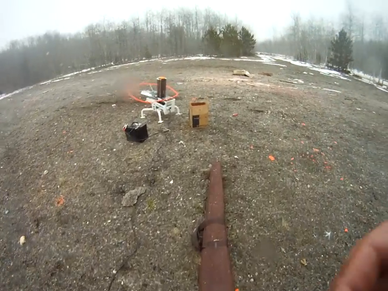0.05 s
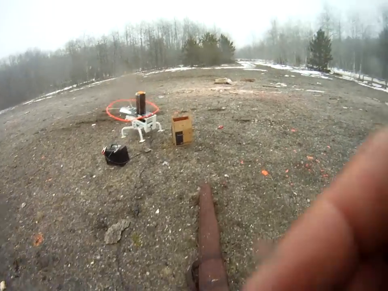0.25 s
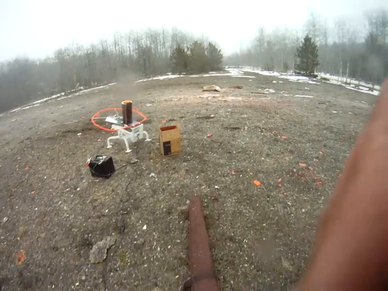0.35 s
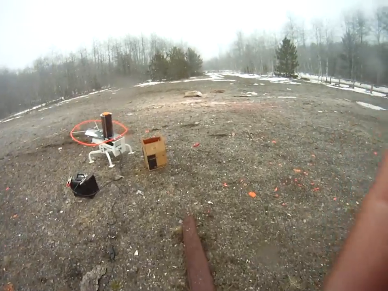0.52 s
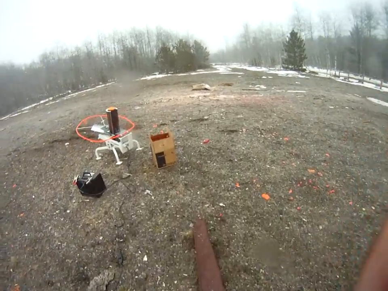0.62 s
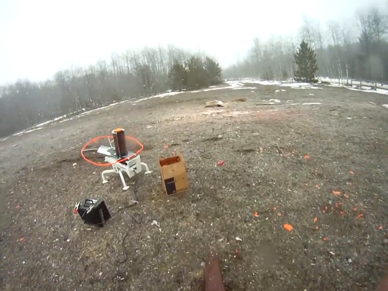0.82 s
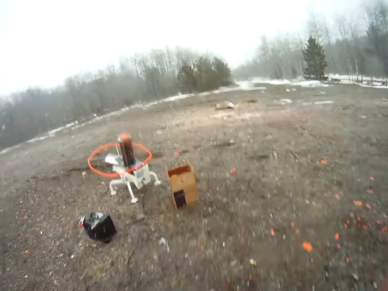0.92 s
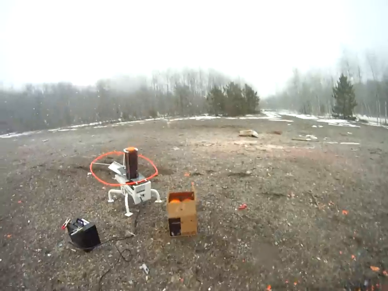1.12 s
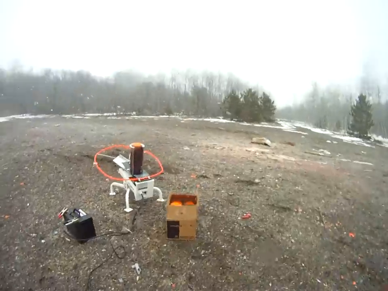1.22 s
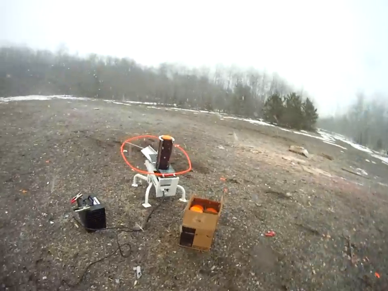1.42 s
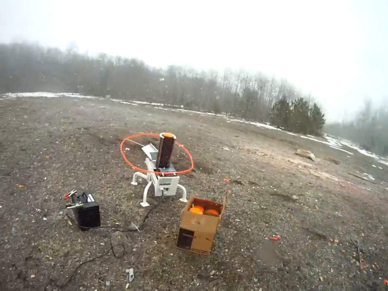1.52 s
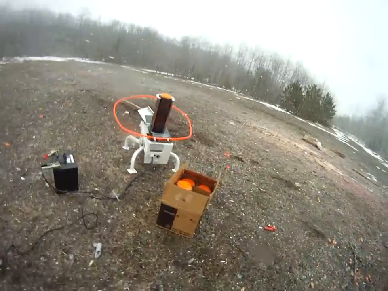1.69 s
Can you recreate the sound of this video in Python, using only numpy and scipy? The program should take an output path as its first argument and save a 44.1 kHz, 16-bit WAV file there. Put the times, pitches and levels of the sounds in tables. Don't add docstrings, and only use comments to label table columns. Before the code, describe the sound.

Close handling noise on a hard camera housing: light ticks, one loud sharp knock with metallic clinking, then rubs and low thumps, a gritty scrape, and scattered taps, over faint outdoor hiss, in coarse lo-fi sound.

```python
import sys
import numpy as np
from scipy import signal
from scipy.fft import rfft, irfft, next_fast_len
from scipy.io import wavfile
from scipy.ndimage import map_coordinates

SR = 44100
rng = np.random.default_rng(int(sys.argv[2]) if len(sys.argv) > 2 else 0)


def gain_from_db(level_db):
    decades = np.asarray(level_db, float) / 20
    return 10 ** decades


def unload_audio(sound):
    columns = np.transpose(np.atleast_2d(sound))
    steps = np.round(np.clip(columns, -1, 1) * 32767)
    wavfile.write(sys.argv[1], SR, steps.astype(np.int16))


N = 77175


def unit(x):
    return x / np.sqrt(np.mean(x ** 2) + 1e-20)


def along(points, f):
    hz, db = np.transpose(points)
    return gain_from_db(np.interp(np.log(f + 1), np.log(hz + 1), db))


def wobble(rate):
    knots = rng.standard_normal(int(N * 1000 / SR) + 4)
    return map_coordinates(knots, [np.arange(N) * rate / SR])


def filtered(x, response):
    m = next_fast_len(N + SR // 2)
    return irfft(rfft(x, m) * response(np.fft.rfftfreq(m, 1 / SR)), m)[..., :N]


def colored_noise(spectrum):
    return unit(filtered(rng.standard_normal(N), lambda f: along(spectrum, f)))


def body(modes, f):
    total = 0
    for k, (hz, width, db) in enumerate(modes):
        total = total + (-1) ** k * gain_from_db(db) * 1j * f * width / (hz * hz - f * f + 1j * f * width)
    return total


def swings(rows):
    out = np.zeros(N)
    for start_s, level_db, pitch_hz, rise_s in rows:
        t = np.clip(np.arange(N) / SR - start_s, 0, None)
        swell = t / rise_s * np.exp(1 - t / rise_s)
        out = out - gain_from_db(level_db) * swell * np.sin(2 * np.pi * pitch_hz * t)
    return out


def stroke(start_s, length_s, level_db, rise_share):
    u = (np.arange(N) / SR - start_s) / length_s
    peak = np.clip(rise_share, .02, .95)
    press = np.interp(u, [0, peak, 1, 1.15, 1.6], [0, 1.0, 0.23, 0.027, 0])
    return gain_from_db(level_db) * press ** 0.75


def strokes(rows):
    return sum(stroke(*row) for row in rows)


def rub(force, response, grit_db):
    noise = rng.standard_normal(N)
    grit = unit(noise * gain_from_db(grit_db * wobble(400) + 1.8 * wobble(70)))
    return filtered(force * grit, response) / np.std(filtered(grit, response))


# time_s, level_db
SHAKE = [(0, -51.5), (0.198, -54), (.37, -52), (.43, -41.5), (0.468, -33), (.52, -44), (.6, -35),
         (0.837, -47.5), (.89, -42.5), (0.999, -29), (1.07, -40), (1.25, -39), (1.3, -47.5), (1.43, -40),
         (1.48, -37.5), (1.559, -32), (1.66, -41.5), (1.75, -42)]
# pitch_hz, level_db [dB per Hz]
RUMBLE = [(12, -32), (20, 1), (75, -14), (101, -20), (338, -57.5), (483, -51.5), (700, -63.5), (910, -88.5),
          (1540, -120)]
# start_s, level_db [peak], pitch_hz
JOLTS = [
    (0.2142, -8, 616),
    (0.4464, -29, 62),
    (0.5398, -9.5, 44.7),
    (0.8743, -29.5, 43),
]
# start_s, level_db [peak], pitch_hz, rise_s
SWAYS = [
    (1.4565, -18, 41, .016),
    (1.535, -26, 31, .02),
    (1.658, -29, 30, .02),
    (.99, -33, 30, .02),
    (.214, -36, 85, .01),
]


def shaking():
    t = np.arange(N) / SR
    time_s, level_db = np.transpose(SHAKE)
    out = gain_from_db(np.interp(t, time_s, level_db) + 0.53 * wobble(16)) * colored_noise(RUMBLE)
    hold_cycles, decay_cycles, rise_s = 0.45, 2, 0.000067
    for start_s, level_db, pitch_hz in JOLTS:
        u = np.clip(t - start_s, 0, None)
        fall_db = 60 * np.clip(u * pitch_hz - hold_cycles, 0, None) / decay_cycles
        push = np.cos(2 * np.pi * pitch_hz * u) * (1 - np.exp(-u / rise_s))
        out = out - gain_from_db(level_db - fall_db) * push
    return out + swings(SWAYS)


# pitch_hz, level_db [dB per Hz]
AIR = [(88, -37.5), (150, 3.5), (878, -13.5), (1950, -15), (5300, -21), (5900, -34.5), (7670, -59.5),
       (13000, -120)]


def air():
    return gain_from_db(-62 + 1.3 * wobble(10)) * colored_noise(AIR)


# pitch_hz, width_hz, level_db
SHELL = [(1500, 490, -9), (2080, 240, 1.5), (2396, 375, -5), (3525, 320, -6.5), (4960, 1200, -28.5)]
# pitch_hz, width_hz, level_db
DULL = [(887.6, 210, -3.5), (1223, 160, 0.5)]
# start_s, level_db [peak], t60_s, brightness [dB per octave]
TAPS = [(0.0493, -44, 0.016, 1), (0.0526, -14, 0.012, 10), (.1113, -25.5, 0.017, 6.5),
        (.1226, -46, 0.01, 1), (0.1439, -21, 0.022, 5.5), (0.1592, -29.5, 0.011, 5),
        (0.1883, -21, 0.0066, 7.5), (.2134, 8, 0.016, -1.5), (0.2244, -13.5, 0.015, -2),
        (.2316, -11, .015, -1), (0.2457, -1, .018, 3), (.2668, -10.5, .017, 3), (0.3914, -36, 0.016, 4),
        (0.4391, -16.5, 0.0087, -1), (0.4468, -20, 0.011, -8), (.4551, -16.5, 0.017, -1.5),
        (.4751, -13.5, 0.0099, 1), (.5401, -10.5, 0.027, 2.5), (0.553, -33, 0.014, 0),
        (0.66, -9, 0.014, 4.5), (0.8738, -24, 0.0265, -4), (0.9105, -26, 0.012, 5),
        (1.1412, -3.5, 0.016, 4), (1.2105, -23, 0.021, 6.5), (1.3571, -44, 0.014, 6.5),
        (1.4168, -31.5, .013, 6), (1.4557, -12, .013, 10), (1.551, -9.5, 0.014, 0.5),
        (1.5645, -12.5, 0.013, 3), (1.5984, -10, .013, 14), (1.7481, -30.5, 0.012, -12)]


def taps():
    out, t = np.zeros(N + SR), np.arange(SR // 20) / SR
    f = np.fft.rfftfreq(len(t), 1 / SR)
    flat = 0.075
    both_sides = body(SHELL, f) + gain_from_db(-11) * body(DULL, f) + flat
    octaves = np.log2(np.clip(f, 500, 6000) / 2000)
    for start_s, level_db, t60_s, tilt_db in TAPS:
        kick = 3.7 * (t == 0)
        burst = rng.standard_normal(len(t)) * gain_from_db(-60 * t / t60_s) + kick
        ring = irfft(rfft(burst) * both_sides * gain_from_db(tilt_db * octaves), len(t))
        ring = ring * gain_from_db(-15 * t / t60_s)
        out[round(start_s * SR):][:len(t)] += gain_from_db(level_db - 2) * ring / np.abs(ring).max()
    return out[:N]


# pitch_hz, level_db, t60_s
FITTING = [(421, -24.5, 0.34), (702, -25, .08), (973, -17, 0.044), (1182, -9, 0.067), (2412, 1.5, .032),
           (3610, -7, 0.046)]
# start_s, level_db [peak], low_modes_db, middle_mode_db
CLINKS = [(.0655, -15.5, -9.5, 5.5), (.1955, -21.5, -12, 2.5), (.2136, 4, 2, 3.5), (.2318, -4, -1, 1.5),
          (.2448, 0, 1.5, -3), (.2668, -1, 0, -2), (.2975, -15, 0.5, 1.5), (.3021, -9.5, -6, 1.5),
          (.3105, -9.5, -2.5, -2), (.3156, -13.5, 2, -3.5), (1.1411, -22, 13, -2), (1.4861, -15.5, 9, -9)]


def clinks():
    out, t = np.zeros(N + SR), np.arange(SR // 3) / SR
    attack = 1 - np.exp(-t / 0.00043)
    for start_s, level_db, low_db, middle_db in CLINKS:
        ring = 0
        for pitch_hz, mode_db, t60_s in FITTING:
            weight_db = low_db * (pitch_hz < 1000) + middle_db * (2000 < pitch_hz < 3000)
            strength_db = mode_db + weight_db + 2.9 * rng.standard_normal()
            ring = ring + gain_from_db(strength_db - 60 * t / t60_s) * np.sin(2 * np.pi * pitch_hz * t)
        out[round(start_s * SR):][:len(t)] += gain_from_db(level_db - 13.5) * ring * attack
    return out[:N]


# start_s, length_s, level_db, rise_share [0-1], dull_side_db
STROKES = [(0.215, .021, -18.5, 0.5, 8.5), (0.239, .04, -28, 0.8, -5), (0.29, 0.023, -25.5, 1, 2.5),
           (.33, .09, -59.5, 0.64, 3), (0.444, 0.035, -31, 0.4, -0.5), (0.4817, 0.038, -30, 0.32, 1.5),
           (0.512, 0.077, -41.5, 0.36, -3), (0.584, 0.068, -34, 0.48, -9.5),
           (0.652, 0.066, -35.5, 0.13, -6), (0.719, 0.1, -43, 0.2, -4.5), (0.819, 0.36, -47, 0.38, -2),
           (0.969, 0.035, -28.5, 0.82, -13), (0.998, 0.028, -16.5, 0.66, -10.5),
           (1.04, 0.042, -45, 0.75, 0.5), (1.07, 0.074, -37, 0.3, -9), (1.135, 0.022, -42, 0.1, -10),
           (1.17, .15, -65, 0.3, 2), (1.311, .05, -66.5, 0.7, -4), (1.455, 0.027, -27, 0.24, 8),
           (1.483, 0.062, -34, 0.05, 1.5), (1.542, 0.07, -37.5, 0.63, 0), (1.616, 0.029, -38, 0.42, -5),
           (1.651, 0.034, -39, 0.26, 0), (1.672, 0.036, -37, 0.63, 5), (1.722, 0.037, -49.5, 0.56, 2)]
# pitch_hz, level_db [dB per Hz]
SKIN = [(300, -59.5), (800, -21), (2170, -5), (3050, -25.5), (3780, -19), (5900, -17), (7670, -52.5),
        (13000, -120)]
# start_s, length_s, level_db, rise_share [0-1]
PRESSES = [
    (0.209, .03, -44.5, 0),
    (.34, 0.054, -50.5, 0.6),
    (0.443, .07, -36, .3),
    (0.597, .22, -54, 0.42),
    (0.864, 0.034, -46.5, 0.4),
    (0.978, 0.058, -38, 0.2),
    (1.044, 0.12, -50, 0),
    (1.486, 0.0275, -47, 0.27),
]
# pitch_hz, width_hz, level_db
PALM = [(128, 64, 0), (380, 380, -2.5)]
# start_s, length_s, level_db, rise_share [0-1]
CHATTER = [
    (0.221, .051, -25, 0.3),
    (0.987, 0.023, -24.5, 0.7),
    (1.4795, .015, -21.5, 0.2),
    (1.495, 0.029, -31, .21),
    (1.579, .041, -45, 0.6),
    (1.6224, .027, -27.5, 0.5),
]
# pitch_hz, width_hz, level_db
PIN = [(1203, 74, -4), (3640, 88, 1), (2100, 130, -11.5)]


def rubbing():
    force, dull_force = np.zeros(N), np.zeros(N)
    for start_s, length_s, level_db, rise_share, dull_db in STROKES:
        press = stroke(start_s, length_s, level_db, rise_share)
        force = force + press
        dull_force = dull_force + gain_from_db(dull_db - 5.0) * press

    def stiff(f):
        return (1j * f / (650 + 1j * f)) ** 2

    bright = rub(force, lambda f: body(SHELL, f) * stiff(f), grit_db=2)
    dull = rub(dull_force, lambda f: body(DULL, f) * stiff(f), grit_db=1.5)
    skin = gain_from_db(-8) * rub(force, lambda f: along(SKIN, f), grit_db=3.5)
    chatter = rub(strokes(CHATTER), lambda f: body(PIN, f), grit_db=3.5)
    palm = rub(strokes(PRESSES), lambda f: body(PALM, f) ** 2, grit_db=2.0)
    return bright + dull + skin + chatter + palm


# start_s, level_db [peak], pitch_hz, rise_s
ROCKING = [(.2134, 2, 2041, 0.0011), (.2138, -0.5, 2384, .0012), (.2141, -7, 780, .0014),
           (.2138, -15.5, 500, .0012), (.2238, -7.5, 2065, 0.0013), (.2285, -11, 2054, 0.0018),
           (.2315, -5.5, 2090, 0.001), (.2445, -5.5, 2030, 0.0018), (.2452, -14, 3760, 0.00038),
           (.2668, -13.5, 2050, .0008), (.2685, -15.5, 2064, .0015), (.3015, -25, 2100, 0.00099),
           (.31, -21, 2030, 0.0019), (.5403, -17.5, 1247, 0.0015), (.5435, -25.5, 2030, 0.0016),
           (1.1408, -16, 3300, .0012), (1.5508, -15, 2260, 0.00092), (1.5508, -19, 1483, 0.001),
           (1.551, -21, 2750, 0.0011), (1.5648, -21, 3070, 0.00049)]


def rocking():
    return swings(ROCKING)


def hum():
    t = np.arange(N) / SR
    u, v = np.clip(t - 0.3, 0, None), np.clip(t - 0.325, 0, None)
    pitch_hz = 703 * (1 + 0.06 * np.exp(-u / 0.0392))
    main = gain_from_db(-41 - 60 * u / 0.38) * (1 - np.exp(-u / 0.0044))
    main = main * np.sin(2 * np.pi * np.cumsum(pitch_hz) / SR)
    low = gain_from_db(-49.5 - 60 * v / 0.29) * (1 - np.exp(-v / 0.012))
    low = low * np.sin(2 * np.pi * 646 * v)
    return main + low


# start_s, length_s, level_db, rise_share [0-1]
CATCHES = [
    (0.988, .036, -18, .8),
    (1.137, .008, -23.5, 0.5),
]
# pitch_hz, width_hz, level_db
RIBS = [(1476, 550, -3.5), (2200, 180, -3.5), (3206, 600, 0.5), (5180, 660, -16.5)]
# start_s, level_db [peak], pitch_hz, rise_s
SLIPS = [(.981, -29, 3320, .0015), (.990, -20, 1850, .0015), (.994, -22, 3383, 0.0033),
         (.999, -16.5, 2100, 0.00099), (1.0035, -10, 2200, 0.0018), (1.005, -21.5, 1454, .002),
         (1.0095, -8.5, 2180, 0.0023), (1.0135, -12, 1500, .003), (1.0165, -14, 3287, 0.0016),
         (1.0205, -8.5, 2296, 0.0012), (1.0228, -10, 1830, 0.0012), (1.0235, -24, 4930, 0.0013),
         (1.0255, -19, 3366, 0.0015), (.454, -29, 2100, 0.0026), (.483, -24.5, 1240, 0.0026),
         (.508, -28, 1390, .003), (.659, -28.5, 3776, 0.0022), (.659, -28.5, 2280, .0015),
         (.874, -30.5, 1210, 0.0012), (1.456, -26.5, 2156, 0.0063), (1.459, -22, 900, 0.0042),
         (1.484, -26.5, 2122, 0.0033), (1.632, -28, 1970, 0.0041)]


def catches():
    return swings(SLIPS) + rub(strokes(CATCHES), lambda f: body(RIBS, f), grit_db=3.0)


def scene():
    mix = rubbing() + taps() + clinks() + shaking() + air() + rocking() + catches() + hum()
    return mix[None]


def band_limit(x):
    return signal.sosfilt(signal.butter(12, 15820, fs=SR, output="sos"), x)


def record(dry):
    hold_hz, out_hz, top_hz = 12000, 48000, 15200
    base = np.clip(dry, -1, 1)
    base = filtered(base, lambda f: gain_from_db(-48 * np.clip((f - 5600) / 600, 0, 2) ** 2))
    mirrored = base * (1 + 2 * np.cos(2 * np.pi * hold_hz * np.arange(N) / SR))

    def hold(f):
        top = gain_from_db(-30 * np.clip((f - top_hz) / 1500, 0, 2))
        return np.sinc(f / hold_hz) / np.sinc(f / out_hz) * top

    held = filtered(mirrored, hold)
    return band_limit(np.clip(held, -1, 1))


dry = scene()
out = record(dry)
unload_audio(out)
```